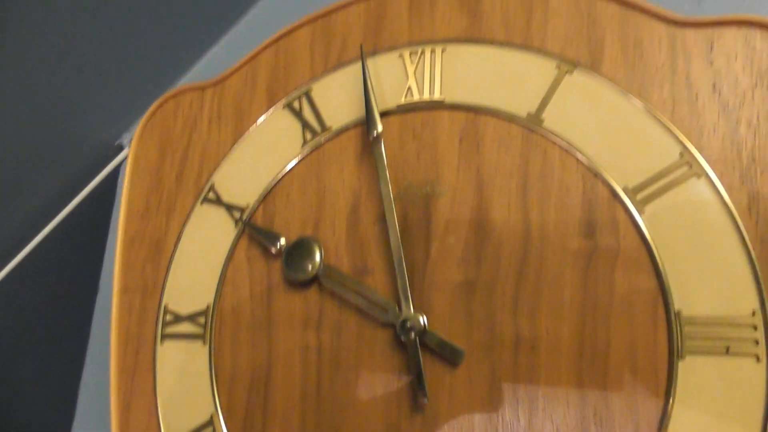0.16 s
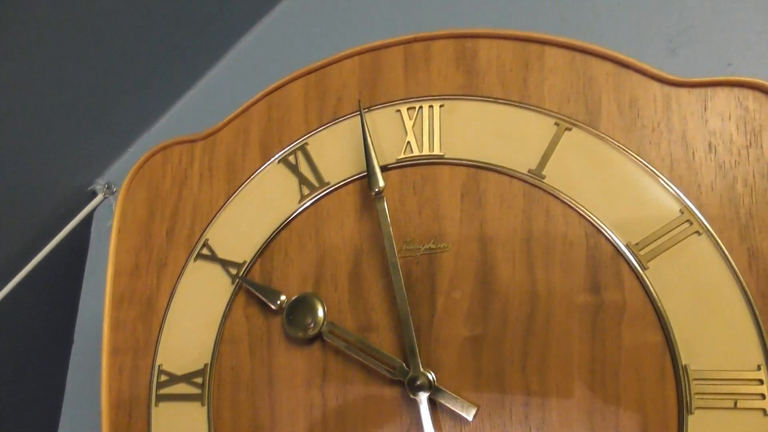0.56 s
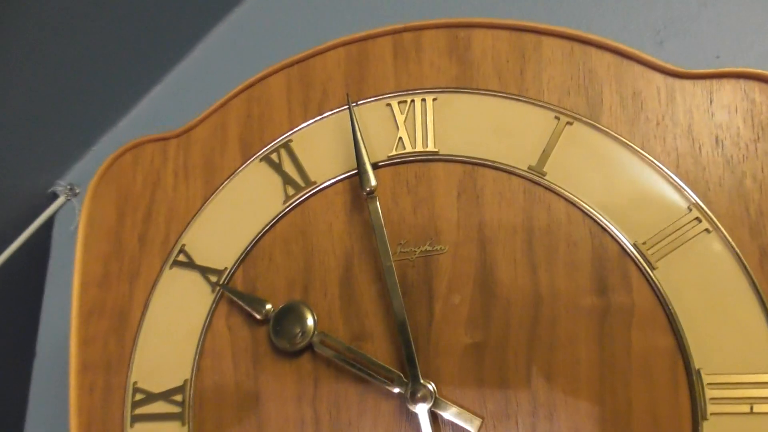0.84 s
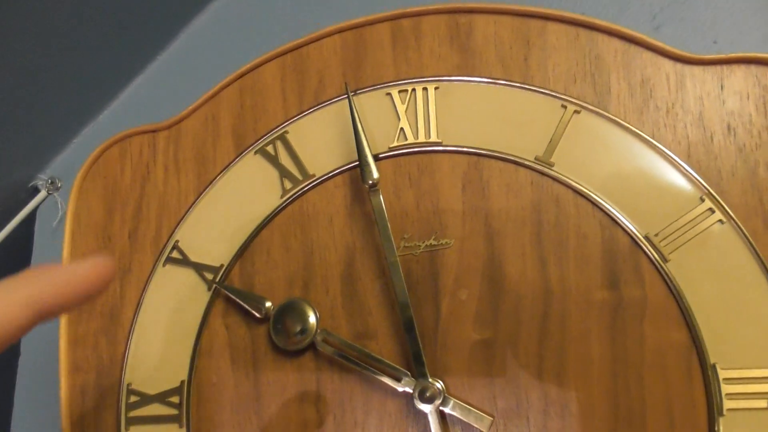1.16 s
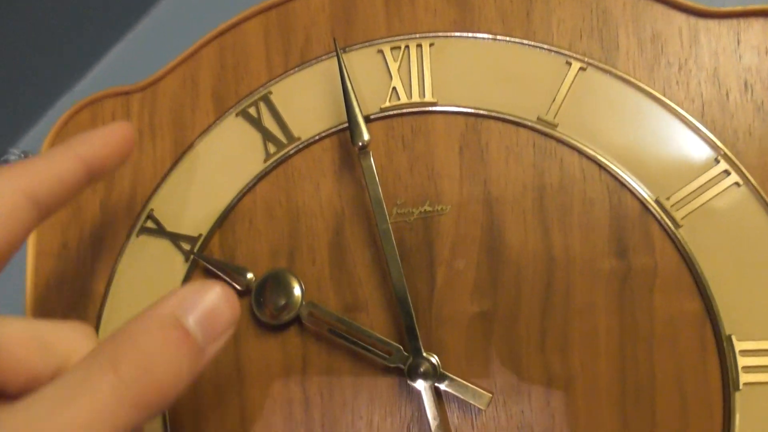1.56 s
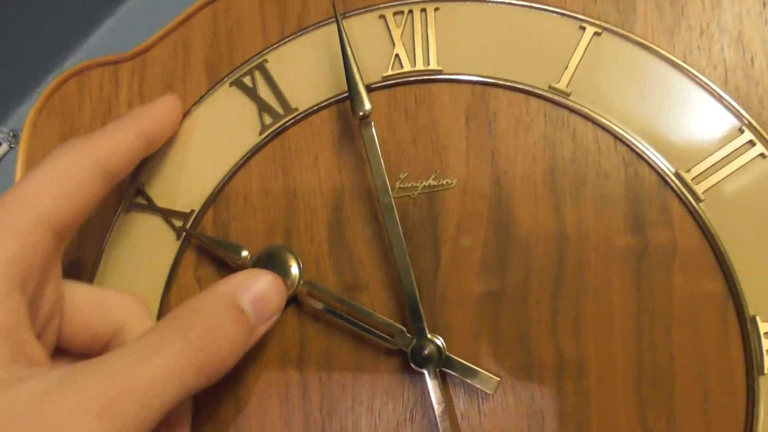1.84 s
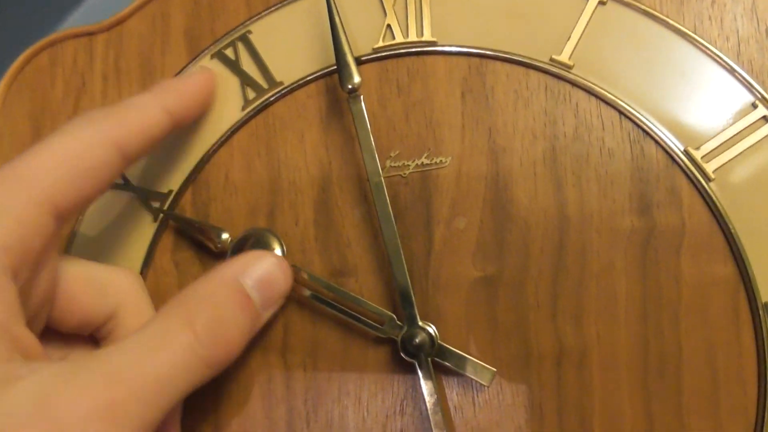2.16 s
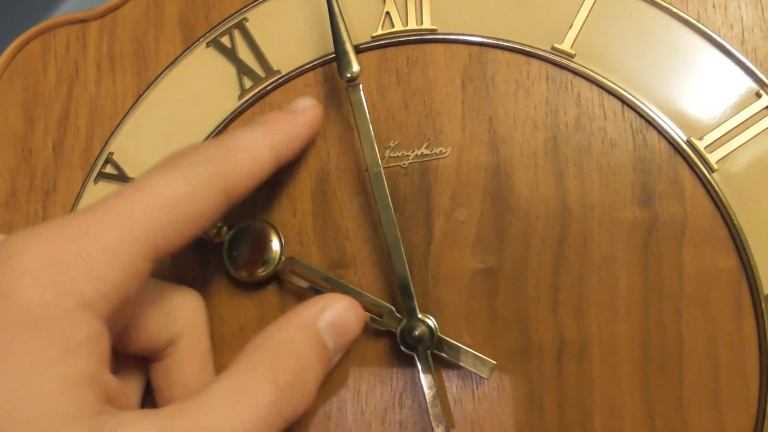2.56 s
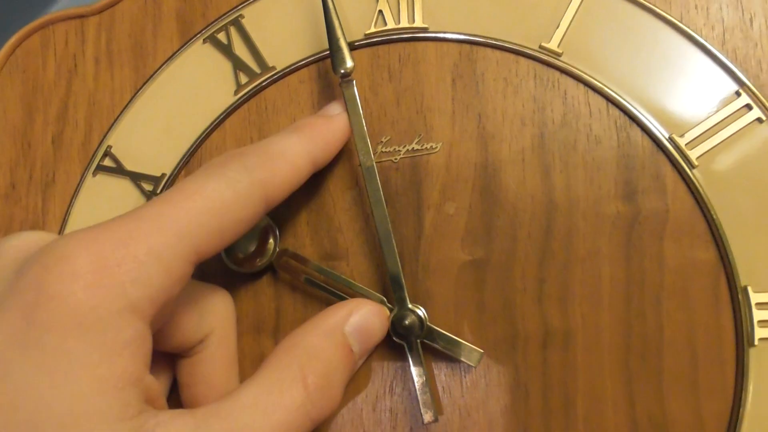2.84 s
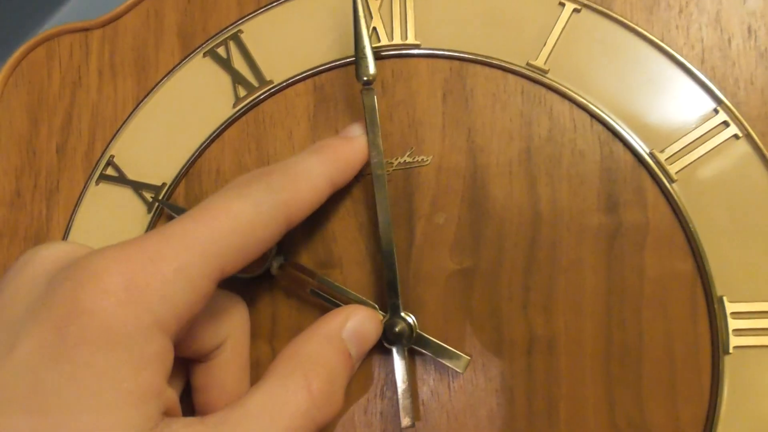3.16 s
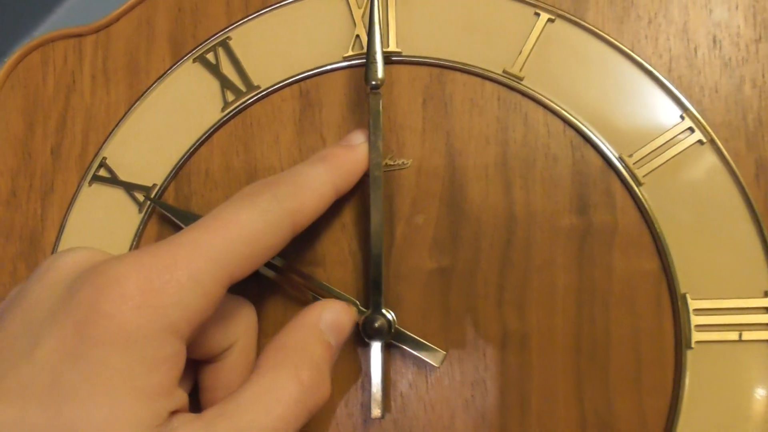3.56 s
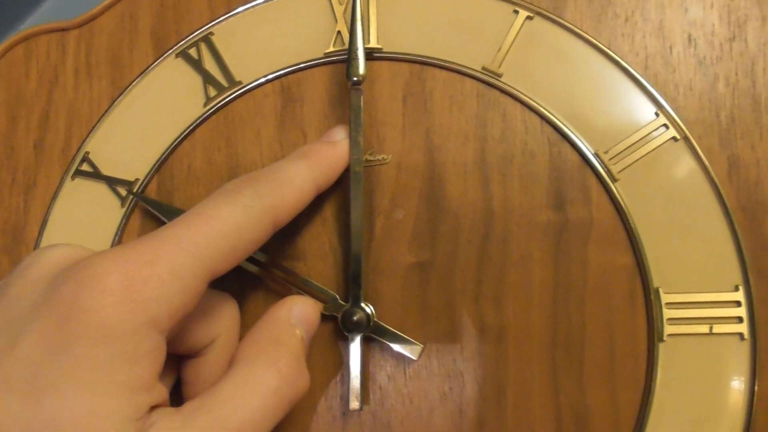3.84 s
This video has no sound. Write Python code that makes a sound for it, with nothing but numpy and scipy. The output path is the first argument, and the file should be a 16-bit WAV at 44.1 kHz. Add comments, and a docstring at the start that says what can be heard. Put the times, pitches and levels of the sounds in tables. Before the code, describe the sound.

Close, steady ticking comes from a wooden wall clock, over soft finger rustles and a faint, quicker clock further off. Near the end, two loud rattling clacks and a low rubbing sound in the quiet room as the hand is pushed.

```python
"""A wooden wall clock ticks close by in a quiet room, over a second, fainter and quicker clock further off.
Soft rustles and touches of the fingers come first; room air, a beating hum and a drone lie under it all.
After some three seconds a finger bumps the minute hand: the works clack twice, each after a creak, thumping
the dial and rattling, and from the second clack the hand rubs round on its arbor.
Ticks, thumps and rattles are damped modes; clicks, rubbing and rustling are shaped, coloured noise."""
import sys
import numpy as np
from scipy import signal
from scipy.fft import rfft, irfft, next_fast_len
from scipy.io import wavfile
from scipy.ndimage import map_coordinates

SR = 44100
rng = np.random.default_rng(int(sys.argv[2]) if len(sys.argv) > 2 else 0)


def dump(signal):
    """Clip the signal to [-1, 1] and save it as 16-bit WAV at the path in sys.argv[1]."""
    limited = np.clip(np.atleast_2d(signal).T, -1, 1)
    pcm = np.round(limited * 32767).astype(np.int16)
    wavfile.write(sys.argv[1], SR, pcm)


N = 176400  # samples: four seconds

# Stereo width of the near sounds: pitch_hz [Hz], likeness [left-right correlation, 0 to 1]
NEAR_LIKENESS = [(200, 0.51), (1000, 0.99), (7000, 1), (9500, 0.68), (12000, 0), (15000, .1)]
# Colour of the wash from the wooden case: pitch_hz [Hz], level_db [dB]
CASE_WASH = [(150, -2), (550, 6), (1100, 11), (1650, -6), (2150, -8.5), (3000, -7.5), (5000, -9),
             (7300, -0.5), (10000, -10), (15000, -34)]
# Modes of the dial and case: pitch_hz [Hz], level_db [dB], t60_s [s]
DIAL_MODES = [(130, -19, 0.17), (259.3, -6.5, 0.18), (281.3, 3.5, 0.25), (327.4, -1.5, 0.25),
              (414, -23, 0.5), (559, -10.5, 0.27), (700, -27.5, 0.46), (1090, -11, 0.13)]


def amp(db):
    """Decibels to gain."""
    return 10 ** (np.asarray(db) / 20)


def unit(x):
    """Scale to rms 1."""
    return x / np.sqrt(np.mean(x ** 2) + 1e-20)


def along(points, hz):
    """Read a curve of (Hz, value) points along a log frequency axis."""
    f, value = np.transpose(points)
    return np.interp(np.log(hz + 1), np.log(f + 1), value)


def seconds(size):
    """Time axis in seconds for a number of samples."""
    return np.arange(size) / SR


def swell(t, peak_s, half_s):
    """A bell-shaped rise and fall around its peak."""
    return np.exp(-.5 * ((t - peak_s) / half_s) ** 2)


def filtered(x, response):
    """Shape x by a zero-phase gain curve, a function of frequency."""
    size = x.shape[-1]
    padded = next_fast_len(size + 8192)  # silence keeps the end from wrapping into the start
    spectrum = rfft(x, padded) * response(np.fft.rfftfreq(padded, 1 / SR))
    return irfft(spectrum, padded)[..., :size]


def noise(colour, likeness, size=N):
    """Coloured stereo noise of rms 1; the mid-side mix sets the left-right likeness at each frequency."""
    def mid_side_gains(hz):
        turn = np.arccos(np.clip(along(likeness, hz), -1, 1)) / 2
        return amp(along(colour, hz)) * [np.cos(turn), np.sin(turn)]

    mid, side = filtered(rng.standard_normal((2, size)), mid_side_gains)
    return unit(np.array([mid + side, mid - side]))


def burst(colour, likeness, attack, hold, t60):
    """Noise that rises, holds and dies away (times in s; the hold counts from the onset)."""
    t = seconds(SR // 2)
    rise = np.minimum(t / attack, 1)
    fall = amp(-60 * np.maximum(t - hold, 0) / t60)
    return noise(colour, likeness, size=len(t)) * rise * fall


def ring(modes, attack, scatter_db=1):
    """Damped sine modes, their levels and phases a little different at each blow."""
    # Phase lead of left over right: pitch_hz [Hz], lead_rad [rad]
    left_lead = [(100, 0.92), (500, 0.0025), (1000, 0.32), (2000, 0.69), (6500, 0.16), (9000, 0.71),
                 (11000, 2.3), (15000, 1.2)]
    t, out = seconds(SR // 2), 0
    for hz, db, t60 in modes:
        phase = 0.13 * rng.standard_normal() + along(left_lead, hz) * np.array([[.5], [-.5]])
        decay = amp(db + scatter_db * rng.standard_normal() - 60 * t / t60)
        out = out + decay * np.sin(2 * np.pi * hz * t + phase)
    return out * (1 - np.exp(-t / attack))


def add(track, s, sound):
    """Lay a sound into a track at time s, in place."""
    part = track[:, round(s * SR):][:, :sound.shape[1]]
    part += sound[:, :part.shape[1]]


def in_room(sound):
    """A short sound with a noise tail for the room, each frequency dying at its own speed."""
    # Room decay: pitch_hz [Hz], t60_s [s]
    room_decay = [(200, 0.92), (1000, 0.21), (3000, 0.32), (8000, 0.22), (15000, 0.45)]
    # Level of the tail against the dry sound: pitch_hz [Hz], send_db [dB]
    room_send = [(200, -18), (350, -16.5), (600, -12.5), (1000, -16), (3000, -20.5), (8000, -26.5),
                 (15000, -16.5)]
    hz, t, cells = signal.stft(rng.standard_normal((2, SR // 2)), SR, nperseg=256)
    decay = amp(-60 * t / along(room_decay, hz)[:, None])
    build_up = np.minimum(t / 0.024, 1)
    tail = signal.istft(cells * decay * build_up, SR, nperseg=256)[1]
    tail = filtered(tail / np.linalg.norm(tail[0]), lambda f: amp(along(room_send, f)))
    return sound + signal.fftconvolve(sound, tail, axes=1)[:, :sound.shape[1]]


def escapement():
    """A tooth lands on each pallet in turn: a click, the pallet's ring and a short wash from the case."""
    # Beats, alternately tick and tock: start_s [s], ring_db [dB], click_db [dB]
    beats = [(.392, -44, -40.5), (1.039, -47, -40.5), (1.6715, -41.5, -42.5), (2.314, -44, -40.5),
             (2.9455, -38, -37.5), (3.591, -40.5, -40)]
    # Modes of the two pallets: pitch_hz [Hz], level_db [dB], t60_s [s]
    tick_modes = [(590, -15, 0.17), (805, -2.5, 0.039), (856, -6, 0.14), (918, 3, 0.048), (1262, -25, 0.34),
                  (1956, -4.5, 0.023), (2528, -18.5, 0.14), (3920, -19.5, 0.08), (6560, 12.5, 0.016),
                  (6900, -3, 0.047), (7730, 7.5, 0.019), (8150, -6.5, 0.064), (10850, 2, 0.026),
                  (11600, -12, 0.041)]
    tock_modes = [(580, -15, 0.21), (781, 3.5, 0.08), (875, -3.5, .11), (985, 9, 0.022),
                  (1165, -19.5, 0.28), (1340, -8.5, 0.087), (2080, -10, 0.069), (3500, -17, 0.075),
                  (7250, 2.5, 0.042), (6750, -64, .06), (7900, -23.5, 0.067), (10160, 2.5, 0.05),
                  (10280, -13, 0.027), (11700, -57, .05)]
    # Colour of the tooth's click: pitch_hz [Hz], level_db [dB]
    click_colour = [(200, -10), (700, 18), (1200, -23), (1650, -19), (2200, 1), (5200, -15.5), (7000, 5),
                    (9000, -12), (11000, 6.5), (16000, -20)]
    out = np.zeros((2, N))
    for k, (start_s, ring_db, click_db) in enumerate(beats):
        click = burst(click_colour, NEAR_LIKENESS, attack=0.003, hold=0.003, t60=0.014)
        wash = amp(-12.5) * burst(CASE_WASH, NEAR_LIKENESS, attack=0.006, hold=0.0013, t60=0.18)
        pallet = ring((tick_modes, tock_modes)[k % 2], attack=0.0033)
        add(out, start_s, in_room(amp(ring_db) * pallet + amp(click_db) * (click + wash)))
    return out


def works():
    """Each contact snaps and clicks, knocks the frame, thumps the dial and rings the lever and its spring."""
    # Contacts as the hand is pushed: start_s [s], click_db [dB], contact_s [s],
    # knock_db [dB], dial_db [dB], lever_db [dB], spring_db [dB]
    clacks = [(3.1951, -25.5, 0.0022, -26, -28.5, -49, -67), (3.2484, -45.5, 0.0018, -49, -65, -49, -80),
              (3.262, -41, 0.00067, -47, -48, -59, -62), (3.5244, -40, 0.0023, -35, -78, -20.5, -34),
              (3.5407, -22, 0.0013, -40, -51, -42, -42), (3.56, -35.5, 0.0023, -68, -81, -50, -67),
              (3.574, -40, .0015, -57, -68, -65, -72)]
    # Modes of the lever and of its spring: pitch_hz [Hz], level_db [dB], t60_s [s]
    lever_modes = [(574, -16.5, 0.039), (781, -12, 0.071), (913, 1.5, 0.075), (1050, -21, .05),
                   (1133, -7, 0.03), (1433, 1.5, 0.019), (1910, -6, 0.022), (2135, -8.5, 0.028),
                   (3500, -22.5, 0.047)]
    spring_modes = [(5520, -1.5, 0.056), (7940, -19, .05), (10600, 2, 0.046), (15000, 0, .03)]
    # Colours of the click and of the frame's knock: pitch_hz [Hz], level_db [dB]
    click_colour = [(300, -16), (1000, 1.5), (2900, -18), (4300, -9.5), (5000, -5.5), (7000, 2), (9700, 5),
                    (12000, 1.5), (16000, -18)]
    knock_colour = [(80, -23), (200, -4.5), (400, -16.5), (700, 1.5), (1000, 7.5), (1250, -17), (1420, -2),
                    (1650, -27), (2050, -2.5), (2600, -20.5), (5000, -21), (12000, -36)]
    grip_s = 0.12  # after a clack the finger settles and chokes the dial's ring in this time
    out = np.zeros((2, N))
    choke = 1 / np.sqrt(1 + (seconds(SR // 2) / grip_s) ** 6)
    for start_s, click_db, contact_s, knock_db, dial_db, lever_db, spring_db in clacks:
        # the first hard edge, then a softer click and the wash of the case
        click = burst(click_colour, NEAR_LIKENESS, attack=0.00018, hold=contact_s, t60=0.006)
        click += amp(-6.5) * burst(click_colour, NEAR_LIKENESS, attack=0.00076, hold=0.0046, t60=0.024)
        click += amp(-14) * burst(CASE_WASH, NEAR_LIKENESS, attack=0.0055, hold=0.0038, t60=0.23)
        knock = burst(knock_colour, [(1000, 0.96)], attack=0.0037, hold=0.0056, t60=0.055)
        thump = amp(dial_db) * choke * ring(DIAL_MODES, attack=0.008)
        lever = amp(lever_db) * ring(lever_modes, attack=0.0031)
        spring = amp(spring_db) * ring(spring_modes, attack=0.0015)
        add(out, start_s, in_room(amp(click_db) * click + amp(knock_db) * knock + thump + lever + spring))
    return out


def fingers():
    """A fingertip taps the dial and damps its ring; under the push the hand creaks."""
    # Soft touches on the dial and hands: start_s [s], dial_db [dB], tap_db [dB]
    touches = [(0.021, -71, -68), (0.092, -67, -60), (0.911, -81, -62.5), (1.824, -68, -62),
               (1.901, -55.5, -63), (1.965, -62.5, -72), (2.758, -43.5, -50), (2.828, -51.5, -66),
               (3.020, -50, -54)]
    # Creaks as the hand takes up the strain before each clack: peak_s [s], half_s [s], level_db [dB]
    creaks = [(3.131, 0.023, -61.5), (3.51, 0.0064, -46.5)]
    # Colours of tap and creak: pitch_hz [Hz], level_db [dB]
    tap_colour = [(150, -1), (450, -5.5), (780, 3.5), (1100, -5), (1650, -21), (2200, -12), (5000, -32),
                  (12000, -39)]
    creak_colour = [(300, -21), (650, -15), (790, 3), (950, -16), (1600, -29), (5000, -42)]
    damping_db_per_s = 123  # extra decay while a finger rests on the dial
    out, t = np.zeros((2, N)), seconds(N)
    damping = amp(-damping_db_per_s * seconds(SR // 2))
    for start_s, dial_db, tap_db in touches:
        tap = burst(tap_colour, [(1000, 1.0)], attack=0.00086, hold=0.0033, t60=0.029)
        thump = amp(dial_db) * damping * ring(DIAL_MODES, attack=0.0043)
        add(out, start_s, in_room(thump + amp(tap_db) * tap))
    strain = sum(amp(db) * swell(t, peak_s, half_s) for peak_s, half_s, db in creaks)
    return out + strain * noise(creak_colour, NEAR_LIKENESS)


def rubbing():
    """The hand slips round on its friction arbor in tiny uneven jerks, each with a low grind and a dry hiss."""
    # Course of the grind: time_s [s], level_db [dB]
    grind_course = [(3.51, -57), (3.53, -52.5), (3.61, -61), (3.68, -55), (3.756, -55), (3.761, -50.5),
                    (3.83, -54.5), (3.87, -53), (3.93, -51), (4.0, -50.5)]
    # Colours of grind and hiss: pitch_hz [Hz], level_db [dB]
    grind_colour = [(120, -9), (280, -6.5), (380, -0.5), (460, -17), (570, 4.5), (690, -7), (860, 1),
                    (980, -5), (1090, 0), (1300, -11.5), (1680, -25), (2150, -19), (2700, -34), (3450, -17),
                    (3900, -27.5), (4450, -20.5), (5040, -29), (7400, -21.5), (13000, -25)]
    hiss_colour = [(1000, -9), (5000, -5), (7300, 0), (13500, -10), (15500, 2), (16200, -25)]
    slips_per_s, slip_spread_db, hiss_db = 220, 1, -69.5
    t, start_s = seconds(N), grind_course[0][0]
    slips = (rng.random(N) < slips_per_s / SR) * amp(slip_spread_db * rng.standard_normal(N))
    slip_decay = amp(-60 * seconds(SR // 20) / 0.024)
    jerks = unit(signal.fftconvolve(slips, slip_decay)[:N])
    grind_level = amp(np.interp(t, *np.transpose(grind_course)))
    grind = grind_level * unit((1 + jerks) * noise(grind_colour, NEAR_LIKENESS))
    hiss_level = amp(hiss_db) * np.clip((t - start_s) / 0.094, 0, 1)
    hiss = hiss_level * unit((.5 + jerks) * noise(hiss_colour, NEAR_LIKENESS))
    return (grind + hiss) * (t > start_s)


def far_clock():
    """A quicker, thinner beat of ringing modes, half lost in the wash of the room."""
    # Beats, alternately tick and tock: start_s [s], level_db [dB]
    beats = [(.503, -60), (1.021, -59), (1.570, -61), (2.089, -60.5), (2.637, -62), (3.157, -58),
             (3.708, -61.5)]
    # Modes of tick and tock: pitch_hz [Hz], level_db [dB], t60_s [s]
    tick_modes = [(1043, 2.5, .2), (1130, -2, 0.21), (2110, -2, 0.15), (3350, 0.5, 0.17), (4130, -1, 0.067),
                  (6300, -10, 0.11)]
    tock_modes = [(1148, -6, 0.35), (2310, -13, 0.24), (3574, 4, 0.13), (3770, -13.5, 0.27)]
    # Colour of the wash: pitch_hz [Hz], level_db [dB]
    wash_colour = [(500, -3), (1080, 0.5), (1650, -14.5), (2150, -10), (2900, -12), (3500, -17),
                   (4200, -10.5), (5000, -26.5), (7000, -18), (14000, -28)]
    out = np.zeros((2, N))
    for k, (start_s, db) in enumerate(beats):
        wash = burst(wash_colour, [(1000, 1.0)], attack=0.0034, hold=0.024, t60=0.2)
        wash_gain = amp((-1, -5)[k % 2])  # weaker on the tock
        beat = ring((tick_modes, tock_modes)[k % 2], attack=.001)
        add(out, start_s, amp(db) * (beat + wash_gain * wash))
    return out


def rustles():
    """Soft, grainy swells of brushing noise as the fingers move over the clock."""
    # Swells: peak_s [s], half_s [s], body_db [dB], hiss_db [dB]
    swells = [(0.003, 0.017, -65, -72.5), (.09, 0.067, -59.5, -68), (0.472, 0.092, -60.5, -66),
              (1.851, .022, -65, -65.5), (1.889, 0.02, -62.5, -73), (1.999, 0.055, -66, -77),
              (2.32, 0.078, -68.5, -67), (2.489, 0.014, -66, -63), (2.619, 0.026, -72, -65),
              (2.788, 0.095, -63.5, -72.5)]
    # Colours of body and hiss: pitch_hz [Hz], level_db [dB]
    body_colour = [(100, 0.5), (240, 5), (283, 1), (305, -10.5), (333, 11), (380, -3.5), (700, -1.5),
                   (1100, -6.5), (1700, -23.5), (5000, -46.5)]
    hiss_colour = [(1000, -26.5), (3500, -3), (5200, -7.5), (7500, 2), (11000, -4.5), (16000, -17)]
    grain_db, grain_s = 2, .006  # depth and size of the grain
    t, out = seconds(N), 0
    body = noise(body_colour, [(500, 0.53)])
    hiss = noise(hiss_colour, NEAR_LIKENESS)
    for peak_s, half_s, body_db, hiss_db in swells:
        out = out + swell(t, peak_s, half_s) * (amp(body_db) * body + amp(hiss_db) * hiss)
    # random levels, one each grain_s, joined smoothly
    grain = map_coordinates(rng.standard_normal(N // 20), [t / grain_s], mode="wrap")
    return out * unit(amp(grain_db * grain))


def background():
    """Room air and hiss as noise, a slowly beating sine hum and a faint drone wavered by narrow noise."""
    # Colour of the air: pitch_hz [Hz], level_db [dB]
    air_colour = [(20, -7), (50, -5.5), (100, 3.5), (200, -0.5), (300, -2.5), (500, -8), (640, -3.5),
                  (770, -12), (960, -9.5), (1500, -22), (1780, -25.5), (2000, -13), (2600, -28.5),
                  (4000, -24), (5100, -34), (6300, -24), (8000, -18.5), (9500, -20), (15600, -20.5),
                  (16200, -49)]
    # Stereo width of the air: pitch_hz [Hz], likeness [left-right correlation, 0 to 1]
    air_likeness = [(60, 0.16), (200, 0.13), (700, 0.22), (2000, 0.96), (7000, 1), (9500, 0.3),
                    (15000, 0.086)]
    air_db, drone_hz, drone_db = -64, 187.6, -68.5
    hum_hz, hum_db, beat_hz, crest_s, beat_depth = 48.5, -67.5, 0.72, 0.49, 0.88
    t = seconds(N)
    beating = 1 + beat_depth * np.cos(2 * np.pi * beat_hz * (t - crest_s))
    hum = amp(hum_db) * beating * np.sin(2 * np.pi * hum_hz * t)
    narrow_band = lambda hz: 1 / (1 + ((hz - drone_hz) / 7) ** 2)
    waver = unit(filtered(rng.standard_normal((2, N)), narrow_band))
    drone = unit(np.sin(2 * np.pi * drone_hz * t) + .5 * waver)
    return amp(air_db) * noise(air_colour, air_likeness) + hum + amp(drone_db) * drone


def scene():
    """The near clock, a little to the left at most frequencies, over the far one and the room."""
    # Stereo balance of the near clock: pitch_hz [Hz], left_minus_right_db [dB]
    balance = [(100, 2), (280, 2.5), (600, 0.1), (5000, -0.5), (8500, 0.5), (12500, 2), (16000, 1)]
    near = escapement() + works() + fingers() + rubbing()
    near = filtered(near, lambda hz: amp(along(balance, hz) * np.array([[.5], [-.5]])))
    return near + far_clock() + rustles() + background()


def record(dry):
    """A steep low-pass: nothing is kept above the band limit."""
    top_hz = 16450  # middle of a slope 300 Hz wide
    return filtered(dry, lambda hz: np.clip((top_hz - hz) / 300 + .5, 0, 1))


dry = scene()
out = record(dry)
dump(out)
```